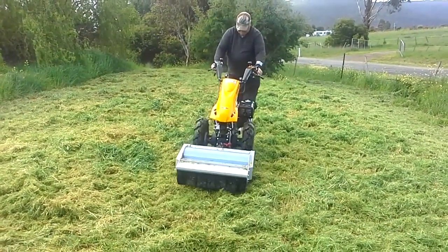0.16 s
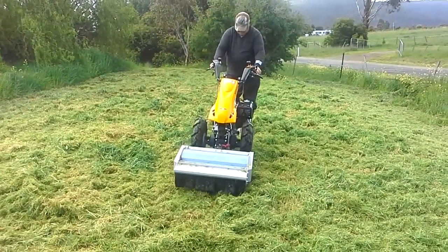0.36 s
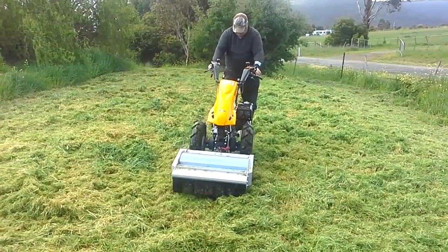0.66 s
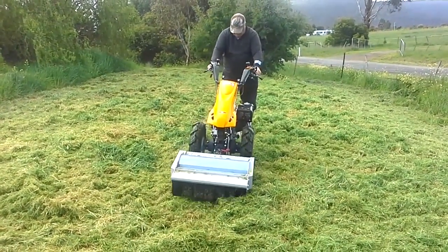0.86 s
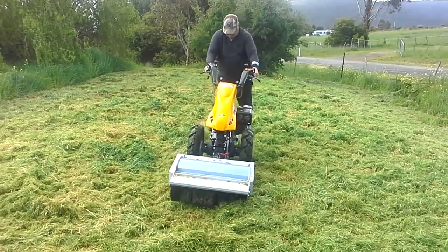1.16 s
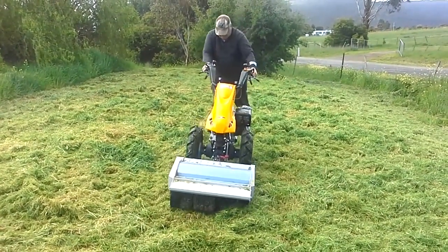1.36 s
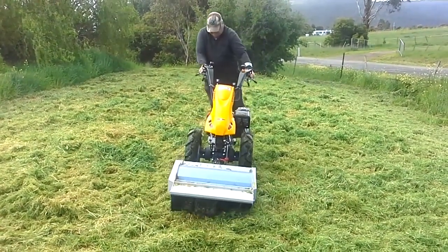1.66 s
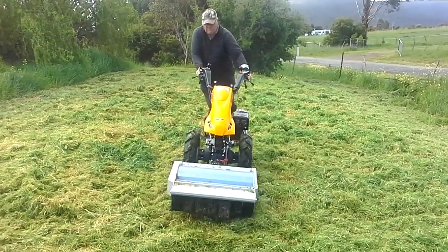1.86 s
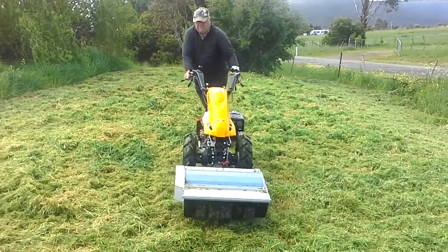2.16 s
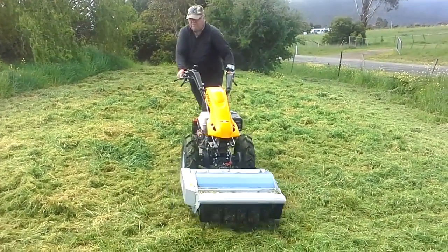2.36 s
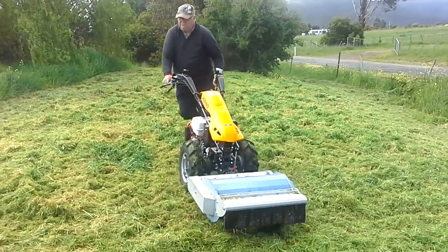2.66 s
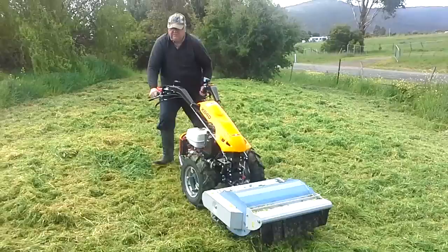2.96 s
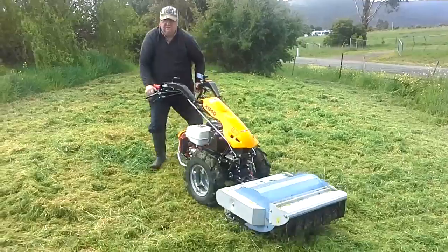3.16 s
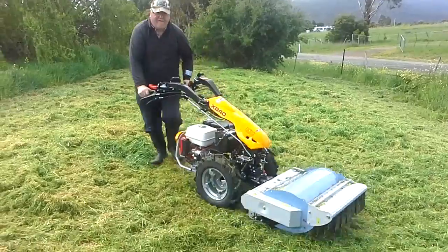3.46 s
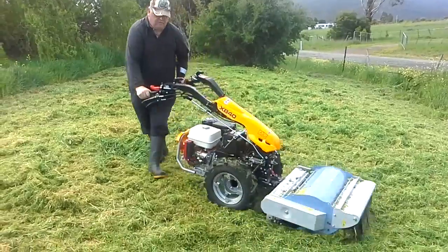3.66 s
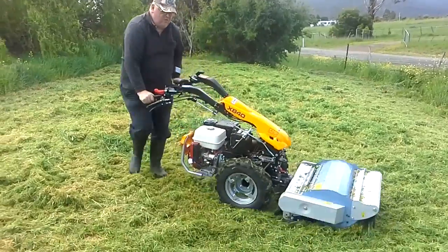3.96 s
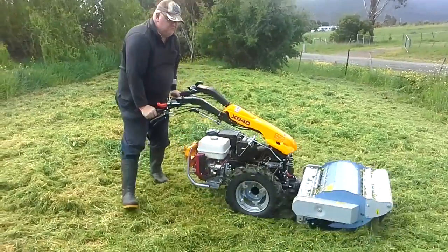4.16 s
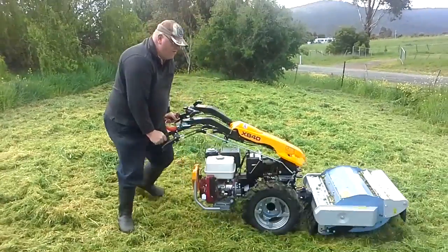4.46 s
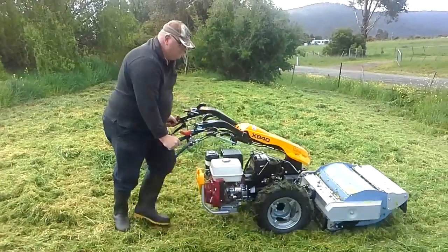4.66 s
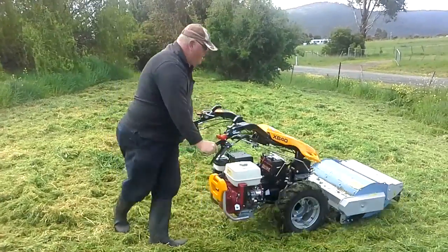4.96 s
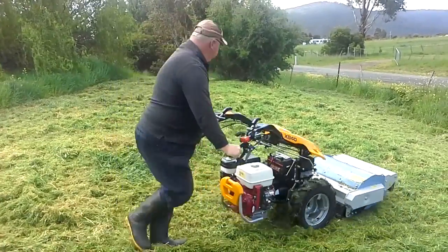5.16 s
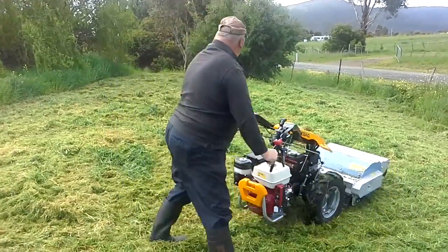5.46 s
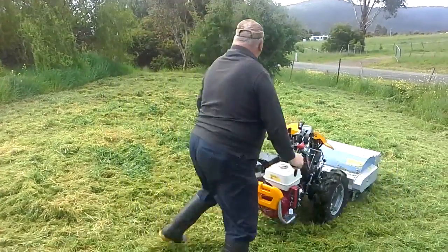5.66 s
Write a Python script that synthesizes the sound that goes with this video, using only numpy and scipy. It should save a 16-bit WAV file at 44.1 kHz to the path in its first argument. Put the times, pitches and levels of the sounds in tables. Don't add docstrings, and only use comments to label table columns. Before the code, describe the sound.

A walk-behind tractor with a flail mower works over cut grass in the open. Its single-cylinder engine chugs fast and evenly under a broad roar of air and chaff. The engine sags slightly around two seconds, then recovers as the machine turns; gear whine and roar swell, and the exhaust grows more resonant as its back comes round. One nearby fixed microphone, no echo, faint wind bumps.

```python
import sys
import numpy as np
from scipy import signal
from scipy.io import wavfile
from scipy.ndimage import uniform_filter1d

SR = 44100
rng = np.random.default_rng(int(sys.argv[2]) if len(sys.argv) > 2 else 0)


def natural_amplitude(level_db):
    exponent = np.asarray(level_db, float) / 20
    return 10 ** exponent


def persist_wave(psi):
    counts = np.round(np.clip(psi, -1, 1) * 32767).astype(np.int16)
    wavfile.write(sys.argv[1], SR, np.atleast_2d(counts).T)


N = 256220
T = np.arange(N) / SR
FREE_SPEED = 29.0
EXHAUST_AT = 0.64
HOP = 256
FRAMES = N // HOP + 5


def evened(x):
    return x / np.sqrt(np.mean(x ** 2) + 1e-20)


def along(rows):
    return np.interp(T, [row[0] for row in rows], [row[1] for row in rows])


def noise_band(cutoff, kind, order):
    return signal.butter(order, cutoff, kind, fs=SR, output="sos")


def drift(per_s):
    slow = signal.sosfilt(noise_band(per_s, "low", 2), rng.standard_normal(N + SR))
    return evened(slow[SR:])


def resonate(x, hz, width):
    r = np.exp(-np.pi * width / SR)
    return signal.lfilter([1 - r], [1, -2 * r * np.cos(2 * np.pi * hz / SR), r * r], x)


def read(points):
    hz, db = np.transpose(points)
    return np.interp(np.log(np.fft.rfftfreq(1024, 1 / SR) + 1), np.log(hz), db)


def coloured(colour):
    a, b, patches = rng.standard_normal((FRAMES, 513, 3)).T
    patches = uniform_filter1d(patches, 10, 0)
    patches = evened(uniform_filter1d(patches, 30, 1))
    field = (a + 1j * b) * colour * natural_amplitude(1.4 * patches)
    return evened(signal.istft(field, nperseg=1024, noverlap=1024 - HOP)[1][:N])


# t/s, firings per second
ENGINE_SPEED = [(0.0, 29.07), (0.25, 28.76), (0.55, 28.8), (1.0, 28.32), (1.5, 28.04), (2.0, 26.94),
                (2.3, 27.84), (2.8, 29.03), (3.55, 29.02), (3.85, 28.7), (4.55, 28.42), (5.81, 28.4)]


def firing_rate():
    return along(ENGINE_SPEED)


def load():
    return FREE_SPEED - firing_rate()


# t/s, angle away from the listener [degrees]
TURN_AWAY = [
    (0, 0),
    (1.2, 5),
    (2.2, 15),
    (3.2, 50),
    (4.0, 75),
    (4.6, 95),
    (5.2, 115),
    (5.81, 140),
]


def heading_now():
    return along(TURN_AWAY)


LISTED_HEADINGS = [0, 15, 50, 78, 115, 140]


def facing(db):
    return natural_amplitude(np.interp(heading_now(), LISTED_HEADINGS, db))


# t/s, length [s], level/dB
WIND_GUSTS = [
    (.62, .12, -56),
    (2.36, .14, -45),
    (2.68, .22, -46),
    (4.27, .2, -40),
    (5.35, .25, -48),
    (5.75, .2, -46),
]


def wind():
    buffet = evened(signal.sosfilt(noise_band((65, 125), "band", 2), rng.standard_normal(N)))
    swell = sum(natural_amplitude(db) * np.exp(-((T - s) / (0.7 * length)) ** 2) for s, length, db in WIND_GUSTS)
    return buffet * swell


# f/Hz, level/dB (per Hz)
DRUMMING = [(20, -50), (43, -32), (100, -23), (157, -13), (200, -7), (300, -3), (400, 0), (470, -3),
            (540, -12), (700, -40)]


def drumming():
    return natural_amplitude(-25.5) * coloured(natural_amplitude(read(DRUMMING))[:, None])


# f/Hz, level/dB (per Hz)
ROAR_FRONT = [(330, -42), (560, -15), (719, 2), (874, -16), (975, -2), (1210, -3.5), (1730, -12.5),
              (1870, -10.5), (2300, -15.5), (2830, -9), (3330, -22.5), (6180, -32.5), (7520, -52),
              (9780, -96), (16500, -120)]
# f/Hz, level/dB (per Hz)
ROAR_FLANK = [(330, -24), (560, -14), (719, -1.5), (894, -16.5), (975, -8), (1220, 2), (1730, -12),
              (1890, -6.5), (2510, -7.5), (3050, -11.5), (3400, -23.5), (6050, -30), (7520, -47),
              (9780, -92), (16500, -120)]
# f/Hz, level/dB (per Hz)
ROAR_REAR = [(330, -24), (560, 0), (704, -14), (856, -1.5), (1110, -6), (1210, -5.5), (1460, -5),
             (1610, -2), (1830, -5), (2480, -7.5), (3400, -20), (5200, -23.5), (7520, -40), (9780, -92),
             (16500, -120)]
ROAR_HEADINGS = [12, 55, 105]
# f/Hz, level/dB
ROAR_BASS_CUT = [(250, -40), (480, 0)]
# t/s, level/dB
ROAR_LEVEL = [(0.0, -22.5), (0.03, -17.5), (0.16, -23.5), (0.45, -20), (2.52, -19.5), (2.9, -16),
              (3.62, -17), (4.16, -17.5), (4.68, -17.5), (5.47, -18.5), (5.71, -20), (5.81, -19)]


def roar(turns):
    heading = np.interp(np.arange(FRAMES) * HOP / SR, *np.transpose(TURN_AWAY))
    colour_db = 0
    for share, side in zip(np.eye(3), (ROAR_FRONT, ROAR_FLANK, ROAR_REAR)):
        weight = np.interp(heading, ROAR_HEADINGS, share)
        colour_db = colour_db + np.outer(read(side) + read(ROAR_BASS_CUT), weight)
    colour = natural_amplitude(colour_db)
    air = coloured(colour / np.linalg.norm(colour, axis=0))
    push = 1 + 0.042 * np.exp(-((turns - EXHAUST_AT) % 1) / 0.06)
    return (natural_amplitude(along(ROAR_LEVEL) - 2.0) * air + drumming()) * push


# f/Hz, width [Hz], level/dB at each of the six listed headings
HOOD_MODES = [(748.3, 67, -31.5, -26.5, -34, -33, -43.5, -30.5),
              (964.7, 42, -40, -58, -25, -34.5, -60, -52), (1217, 130, -29.5, -40.5, -51, -44, -23, -21),
              (1653, 57, -54, -63, -60, -36, -27, -37.5), (2193, 205, -37, -35, -34, -35, -33, -34),
              (2862, 90, -38, -34, -36, -64, -55, -55), (3774, 150, -51, -44.5, -53, -40.5, -42, -44),
              (6170, 290, -57, -51.5, -53, -54, -53, -57)]


def hood():
    beat = rng.standard_normal(N)
    out = np.zeros(N)
    for hz, width, *db in HOOD_MODES:
        tone = evened(resonate(resonate(beat, hz, width), hz, width))
        out += facing(db) * natural_amplitude(2.9 * drift(0.76)) * tone
    return out


# multiple of the firing rate, blur [Hz], level/dB, heading of the beam [degrees], its half width [degrees]
FUZZY_TONES = [(34.2, 31, -26, 59, 11), (44.2, 12, -26.5, 78, 12), (43.2, 15, -36, 127, 8),
               (47.6, 15, -34, 105, 16), (66.6, 51, -33.5, 10.2, 7.5), (65.8, 39, -29.5, 55, 30),
               (71.45, 25, -28, 51, 6.1), (87.3, 38, -31, 12.2, 5.7), (85, 45, -30.5, 43, 17),
               (89.6, 78, -29, 101, 42), (126.5, 36, -41.5, 102, 15), (144.6, 70, -48.5, 9.1, 17),
               (142.9, 80, -42, 58, 16), (156.3, 110, -37.5, 72, 15.4), (99.2, 84, -28.5, 29.4, 9.6),
               (153.6, 41, -44, 140, 8)]


def whines(turns):
    step = 64
    heading = heading_now()
    coarse = np.arange(0, N + step, step) / SR
    out = np.zeros(N)
    for order, blur_hz, db, at, wide in FUZZY_TONES:
        r = np.exp(-np.pi * blur_hz * step / SR)
        chance = rng.standard_normal((len(coarse), 2))
        play = evened(signal.lfilter([1], [1, -2 * r, r * r], chance, axis=0))
        angle = 2 * np.pi * order * turns
        tone = np.interp(T, coarse, play[:, 0]) * np.cos(angle)
        tone += np.interp(T, coarse, play[:, 1]) * np.sin(angle)
        out += natural_amplitude(db) * np.exp(-((heading - at) / wide) ** 2) * tone
    return out


def levels(tones, beams):
    heading = heading_now()
    shade = 0.5 + 0.5 * np.tanh((heading - 60.6) / 6.9)
    inside = [np.exp(-((heading - at) / wide) ** 4) for at, wide, *_ in beams]
    out = []
    for k, (_, front_db, rear_db, load_db) in enumerate(tones):
        lift = sum(share * beam[2 + k] for share, beam in zip(inside, beams))
        out.append(front_db + (rear_db - front_db) * shade + load_db * load() + lift)
    return out


def shafts(turns, tones, beams, waver, flutter_db, throb):
    out = np.zeros(N)
    for (order, *_), level_db in zip(tones, levels(tones, beams)):
        phase = 2 * np.pi * (order * turns + rng.random()) + waver * np.sqrt(order) * drift(11)
        size = natural_amplitude(level_db + flutter_db * drift(20.3))
        out += size * np.sqrt(2) * np.cos(phase + throb * np.sin(2 * np.pi * turns))
    return out


# multiple of the firing rate, level/dB from the front, level/dB from behind, dB per firing a second lost to load
GEAR_TONES = [(14.3, -27.5, -33.5, 2.5), (42.95, -32, -38, -1), (85.3, -38.5, -40, 0)]
# heading [degrees], half width [degrees], gain of each of the three tones [dB]
GEAR_BEAMS = [(18.1, 2.6, 1.5, 5.5, -1), (40.9, 5.6, 4, 7, 0), (80.6, 16, 10, 19.5, 11.5),
              (100.4, 5, 6.5, 0, 0), (118.7, 15.5, -8, 19.5, 7.5)]


def gears(turns):
    return shafts(turns, GEAR_TONES, GEAR_BEAMS, waver=0.022, flutter_db=1.6, throb=0.24)


# multiple of the firing rate, level/dB from the front, level/dB from behind, dB per firing a second lost to load
ROTOR_TONES = [(6.34, -27.5, -31, -0.5), (9.52, -29, -39, 0.5), (12.69, -24.5, -31.5, 1)]


def rotor(turns):
    return shafts(turns, ROTOR_TONES, [], waver=0.019, flutter_db=3.0, throb=0.026)


def pulses(turns, at, spread_db, jitter_s):
    where = np.flatnonzero(np.diff(np.floor(turns - at)))
    luck = rng.standard_normal((len(where), 2))
    moved = where + np.round(luck[:, 0] * jitter_s * SR).astype(int)
    out = np.zeros(N)
    out[np.clip(moved, 0, N - 1)] = natural_amplitude(spread_db * luck[:, 1])
    return out


def ring(clicks, modes):
    return sum(sign * facing(db) * evened(resonate(clicks, hz, width)) for hz, width, sign, *db in modes)


# f/Hz, width [Hz], sign, level/dB at each of the six listed headings
AIRBOX_MODES = [(165, 60, -1, -25, -26, -25, -29, -30, -29), (300, 140, -1, -33, -33, -33, -37, -39, -39)]


def intake(turns):
    return ring(pulses(turns, 0.3367, spread_db=0.8, jitter_s=0.0001), AIRBOX_MODES)


# f/Hz, width [Hz], signed strength, level/dB at the six listed headings
MUFFLER_MODES = [(144.7, 31.6, 1, -35.5, -25.5, -27, -27, -23, -22),
                 (225.9, 19, 1, -25, -19.5, -20.5, -16.5, -31, -22.5),
                 (257.2, 6.9, 0.71, -31, -32, -26, -26, -19.5, -14),
                 (304, 8.2, 0.64, -57, -40, -47, -20, -28, -41),
                 (336, 27, -1.2, -33.5, -28, -45, -25, -36, -36),
                 (417, 75, -1.59, -30, -27, -22.5, -29, -21.5, -32),
                 (488, 37.4, 0.97, -21.5, -18, -20.5, -24.5, -16, -21.5),
                 (523, 33, -0.97, -39, -32, -38, -37, -28, -31),
                 (606, 40, 0.92, -34, -38, -38, -54, -48, -46),
                 (730, 71, -0.71, -41, -29, -28, -28, -55, -49),
                 (986.3, 11, 0.74, -34, -37, -25.5, -43, -21, -33.5),
                 (1245, 52, 0.92, -51, -47, -37, -33, -29, -29)]
MUFFLER_LEAD = [(15, 0), (50, .02), (95, .06)]


def exhaust(turns):
    early = turns + np.interp(heading_now(), *np.transpose(MUFFLER_LEAD))
    puffs = pulses(early, EXHAUST_AT, spread_db=1.4, jitter_s=0.0001)
    valve = np.hanning(round(0.0012 * SR))
    blast = ring(np.convolve(puffs, valve, "same"), MUFFLER_MODES)
    return blast * natural_amplitude(1.0 * (load() - 1))


# multiple of the firing rate, level/dB
CRANK_TONES = [(2, -46), (3, -43), (4, -54)]


def crank(turns):
    return sum(natural_amplitude(db) * np.sqrt(2) * np.cos(2 * np.pi * k * (turns - 0.6)) for k, db in CRANK_TONES)


def engine(turns):
    breath = signal.sosfilt(noise_band(125, "high", 4), intake(turns) + exhaust(turns))
    return crank(turns) - breath


def scene():
    turns = np.cumsum(firing_rate()) / SR
    background = wind() + roar(turns) + hood()
    drive = whines(turns) + gears(turns) + rotor(turns)
    return (background + drive + engine(turns))[None]


def roll_off(x):
    return signal.sosfilt(signal.butter(12, 11500, fs=SR, output="sos"), x)


def record(dry):
    over = np.maximum(abs(dry) - 0.6, 0)
    eased = dry - np.sign(dry) * 0.55 * np.minimum(over, 0.9) ** 2
    return roll_off(np.clip(eased, -1, 1))


dry = scene()
out = record(dry)
persist_wave(out)
```